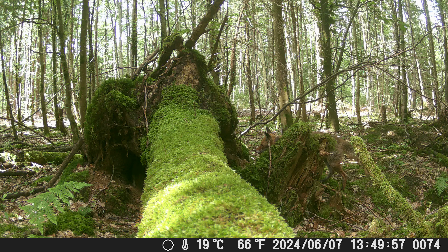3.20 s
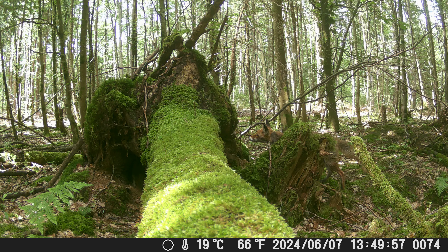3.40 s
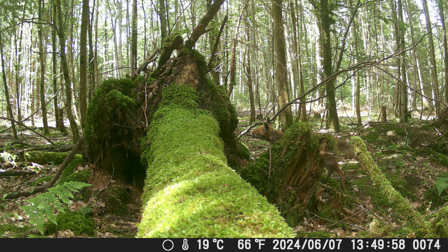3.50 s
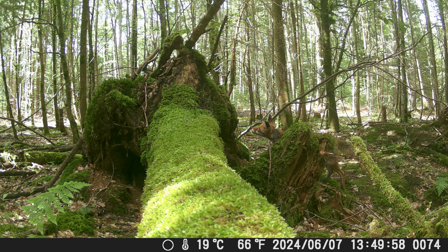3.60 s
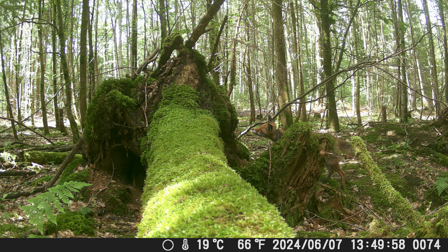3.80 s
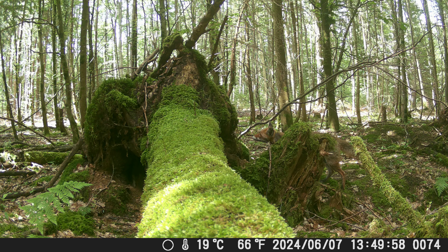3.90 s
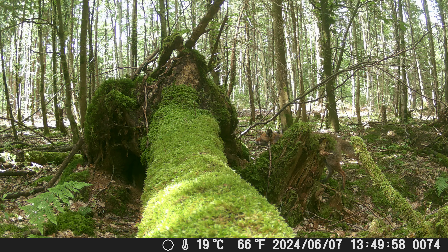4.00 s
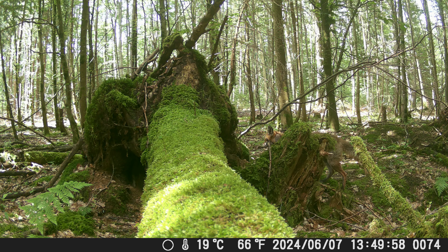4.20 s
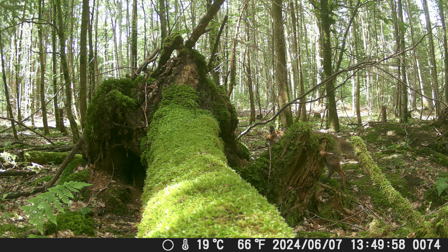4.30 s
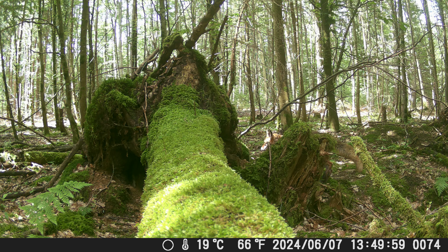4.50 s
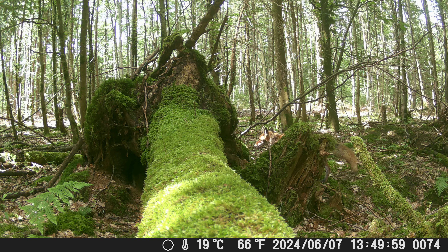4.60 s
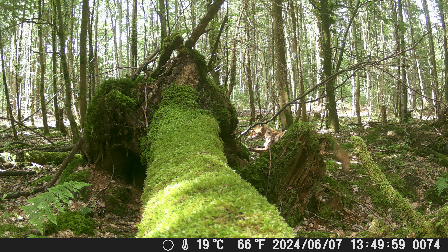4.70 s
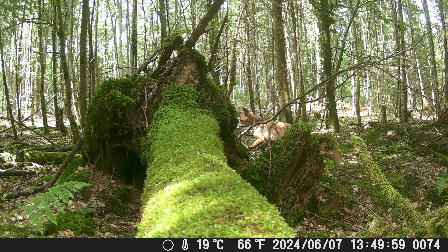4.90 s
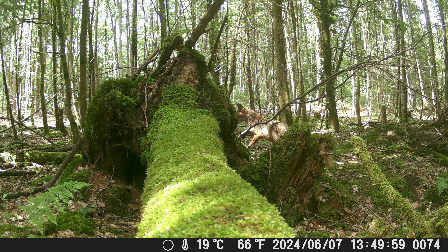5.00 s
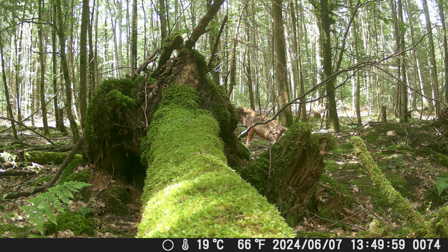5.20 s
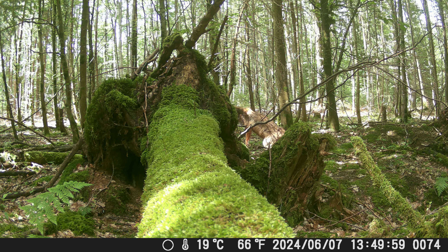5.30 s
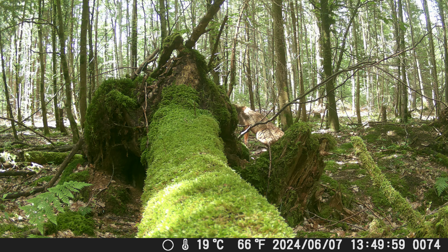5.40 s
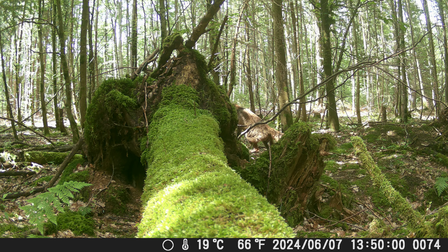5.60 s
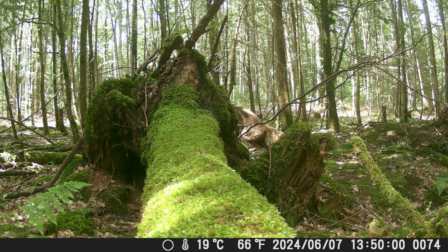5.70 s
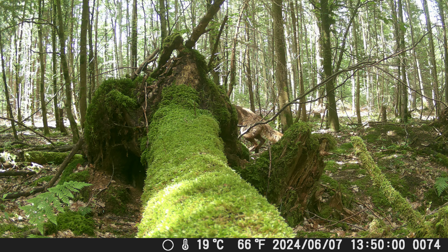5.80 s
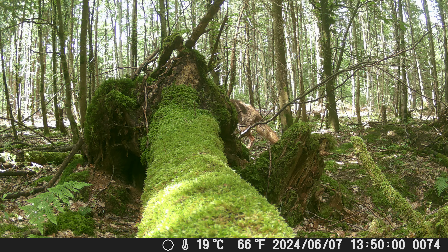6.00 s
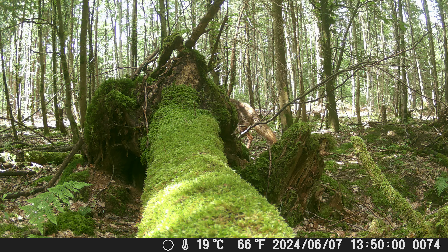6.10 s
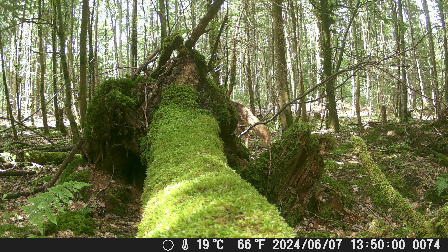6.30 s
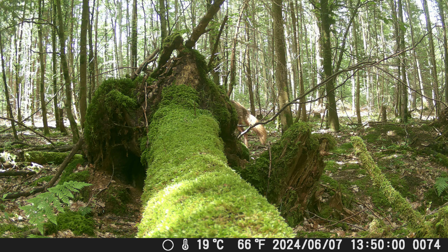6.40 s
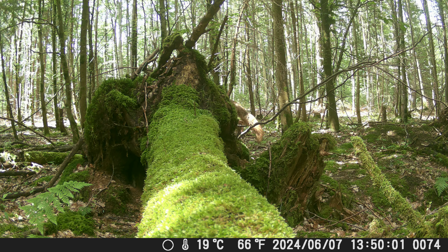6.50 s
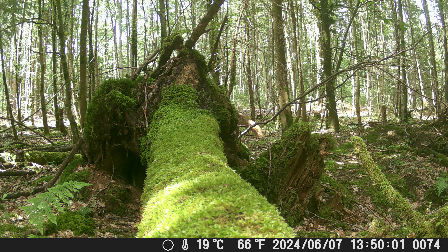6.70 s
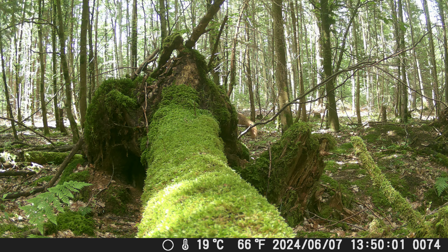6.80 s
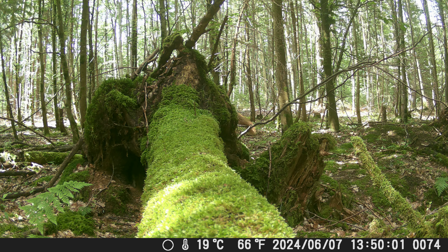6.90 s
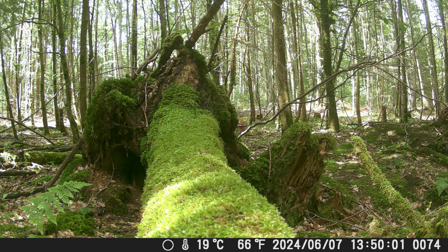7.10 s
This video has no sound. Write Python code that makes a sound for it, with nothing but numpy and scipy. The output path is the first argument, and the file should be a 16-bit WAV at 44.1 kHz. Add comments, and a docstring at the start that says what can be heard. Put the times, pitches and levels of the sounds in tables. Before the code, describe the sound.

Rapid, raspy ticking alarm calls from a nearby small bird echo off trunks, over faint far birdsong and a barely audible low hum.

```python
"""Faint air and a low wavering hum run throughout: shaped noise, and a sine whose strength drifts at random.
From 0.1 s a wren scolds nearby in dry rattles; each tick is a steep falling whistle with a fast rasp.
Echoes off log, stump and twigs smear the ticks, and a longer wash of noise-like echoes off the trunks follows.
From 0.6 s far songbirds whistle in gliding sines; from 0.8 s a second wren adds softer, slowing rattles.
The microphone rings near 7 kHz and bends the waves, which puts a faint knock under each tick."""
import sys
import numpy as np
from scipy import signal
from scipy.fft import rfft, irfft, next_fast_len
from scipy.io import wavfile
from scipy.ndimage import uniform_filter1d

SR = 44100
rng = np.random.default_rng(int(sys.argv[2]) if len(sys.argv) > 2 else 0)


def pcm_store(signal):
    """Save signal as 16-bit PCM."""
    levels = np.round(np.clip(np.atleast_2d(signal), -1, 1) * 32767)
    wavfile.write(sys.argv[1], SR, levels.astype(np.int16).T)


N = 314433  # length in samples
T = np.arange(N) / SR  # time in seconds

# Spectrum of the air in the wood, scaled later to AIR_DB: pitch_hz, relative level_db per Hz
AIR_SPECTRUM = [(20, -2), (50, 0.5), (80, -4), (150, -8.5), (300, -13.5), (700, -19.5), (1500, -23),
                (2500, -27), (3500, -31), (4800, -46), (6700, -46.5), (8500, -50), (10000, -59)]
AIR_DB = -72
HUM_HZ, HUM_DB = 52.1, -81

# The near wren's rattles, before effort, chance and trim:
# start_s, tick_count, pace_ms per tick, skip_ms (how early the second tick comes), level_db,
# fall_ms (time a tick takes to fall to about 4 kHz)
NEAR_RATTLES = [(.1005, 2, 45, 14, -36, 4.7), (.187, 2, 46.7, -0.5, -34.5, 4.5),
                (.288, 7, 47.7, 5.5, -35.5, 5.47), (.632, 4, 44.9, 5, -34.8, 5.1),
                (1.3206, 8, 43.6, 10, -34.5, 5), (1.6903, 4, 43.5, 6.5, -34, 4.9),
                (1.8786, 2, 45, 6, -34, 5.1), (2.011, 2, 45, 9.5, -34.1, 5.2), (2.1197, 2, 45, 7, -35, 5.3),
                (2.3145, 2, 44.5, 12, -36.5, 5.8), (2.4259, 2, 45, 6, -35, 4.9),
                (2.5774, 4, 44.8, 11, -34, 4.56), (2.7698, 2, 45, 0, -34, 4.05),
                (3.2143, 2, 44.6, 14, -35.5, 5.4), (3.2977, 3, 54, 1.5, -32.5, 5.04),
                (3.4494, 7, 44.2, -0.5, -33.5, 5.1), (3.7639, 2, 50.8, 0, -33.6, 4.8),
                (3.8728, 4, 47.9, 0, -32, 5.3), (4.453, 4, 42, 9.5, -34.5, 4.6),
                (4.647, 2, 46, 6.5, -34.5, 5.4), (4.7293, 4, 46.7, 0, -33.5, 4.54),
                (4.9118, 3, 45.3, 0, -33.5, 4.96), (5.6132, 2, 44, 10, -35, 3.7),
                (5.69, 4, 45, 1, -34.5, 3.13), (5.8636, 6, 41.6, 0, -36, 4.4),
                (6.168, 5, 42, 10.5, -36.5, 4.5), (6.4089, 2, 46.6, 0, -38.5, 4.7),
                (7.0152, 4, 38.3, 8, -40, 4.5)]
SKIP_FADE = .55  # ticks come in pairs; each pair keeps this share of the skip of the one before
EFFORT_S = .08  # every tick adds 1 to the bird's effort, which ebbs with this time constant
# A tick at effort 1 and the usual level, and what each further unit of effort adds to it
TICK_HZ, EFFORT_HZ = 6815, 271
RISE_MS, EFFORT_RISE_MS = 4.4, 1.1
EFFORT_FALL_MS, EFFORT_DB = .6, 2
USUAL_DB, HZ_PER_DB = -34.5, 44.5  # rattles louder than usual are higher too
# Chance from tick to tick: share of the pitch, share of the rise and fall times, level in dB
PITCH_SCATTER, LENGTH_SCATTER, SCATTER_DB = .012, .07, 0.28
# Course of one near tick: stage (-1 onset, 0 peak, 1 fallen to about 4 kHz, 3 end),
# pitch_share of the peak pitch, level_db, flutter_depth (no unit)
NEAR_COURSE = [(-1.0626, 1.13, -15, 1), (-0.8416, 1.09, -5.5, 1.0), (-0.2773, 1.03, -1, 1.0),
               (0.24, .935, 1, 0.72), (0.5974, 0.778, -2, 0.87), (0.81, .60, -6.5, 0.25),
               (1.28, .43, -12, 0.84), (2, 0.3354, -17, 0.94), (3, 0.26, -26.5, .5)]
# Low end of the near ticks' sweep: time_s, level_db below 4 kHz
LOW_END_LEVEL = [(.1, 2.5), (.7, .5), (1.7, -1), (2.4, 3), (2.7, 0), (3.3, 1.5), (3.6, -1.5), (6, -2),
                 (6.45, 2), (7.1, 2.5)]
# Echoes off the log and stump, before the bird's bobbing and turning: delay_ms, level_db
NEAR_WREN_ECHOES = [(1.25, -11), (2.5, -9), (3.7, -12.5), (6.3, -11.5), (8.8, -16)]

# Far songbirds, before their mixing levels: start_s, length_s, start_hz, end_hz, level_db,
# warble (random, as a share of the pitch)
FAR_WHISTLES = [(0.579, 0.31, 3870, 3760, -86.5, .02), (0.825, 0.16, 3670, 3870, -83.5, 0.028),
                (1.678, 0.21, 3540, 3391, -82.5, 0.016), (1.867, 0.14, 3110, 2930, -79.5, 0.019),
                (2.076, 0.27, 2588, 2495, -84.5, .025), (2.859, 0.14, 3500, 3760, -86.5, 0.029),
                (3.11, 0.16, 1965, 2076, -73.5, 0.0045), (4.2, 0.15, 2037, 1873, -81, .03),
                (4.497, 0.2, 2710, 2750, -84, 0.0024), (4.767, 0.14, 1927, 2090, -78.5, .015),
                (4.856, 0.29, 2318, 2334, -79.5, 0.0045), (5.88, 0.18, 1880, 1840, -86, 0.016),
                (6.381, .2, 2377, 2364, -74, 0), (6.682, 0.14, 3310, 3280, -86.5, 0.004),
                (6.841, .11, 2380, 2424, -80.5, 0.016)]

# The second wren's rattles, before trim: start_s, tick_count, first_gap_ms, first_level_db, last_level_db
SECOND_RATTLES = [(0.8175, 11, 30.4, -42.5, -44.5), (2.504, 2, 38.5, -47, -47), (2.8048, 5, 42.6, -44, -43),
                  (4.058, 5, 31.6, -58, -49), (4.2432, 6, 36.3, -48.5, -54.5),
                  (5.3645, 7, 31.4, -50, -45.5)]
SLOWING_MS = 1.3  # each of its gaps is this much longer than the one before
# Course of the second wren's tick: stage (0 peak, 3 end), pitch_share of the peak pitch, level_db,
# flutter_depth (no unit)
SECOND_COURSE = [(-0.84, 1.2, -8.5, .6), (-0.26, 1.05, 1, 0.5), (0.44, .96, 2, 0.8),
                 (0.98, .76, -2.5, 0.66), (1.1, .62, -0.5, 0.37), (1.73, .54, -5, .4),
                 (3, 0.44, -19.5, 0.47)]
# Echoes of the second wren, before its bobbing and turning: delay_ms, level_db
SECOND_WREN_ECHOES = [(2.6, -17.5), (6.0, -10), (7.2, -8), (9.0, -13)]

# Response of the microphone in its housing: pitch_hz, level_db
MIC_RESPONSE = [(20, 0), (2500, 1), (3200, -0.5), (4200, 3), (5100, 1.5), (5700, 10), (6300, 19),
                (6800, 21), (7300, 20.5), (7950, 9.5), (8400, 8.5), (9000, 4.5)]
TOP_HZ = 8750  # almost nothing passes far above this pitch


def undb(db):
    """Turn decibels into a plain multiplier."""
    return 10 ** (np.asarray(db) / 20)


def unit(x):
    """Scale to an average strength (rms) of 1."""
    return x / np.sqrt(np.mean(x ** 2))


def colour(x, points):
    """Filter by a spectrum of (Hz, dB) points, joined by straight lines on a logarithmic pitch scale."""
    point_hz, point_db = np.transpose(points)
    size = next_fast_len(len(x) + 4096)
    hz = np.maximum(np.arange(size // 2 + 1) * SR / size, 1)
    gain = undb(np.interp(np.log(hz), np.log(point_hz), point_db))
    return irfft(rfft(x, size) * gain, size)[:len(x)]


def add(out, x, start_s):
    """Mix x into out from a start time."""
    i = max(int(start_s * SR), 0)
    out[i:i + len(x)] += x[:max(len(out) - i, 0)]


def air(swell_db=-0.34):
    """Faint air in the canopy as slowly swelling noise, over a low hum of randomly wavering strength."""
    swell = np.interp(T, np.linspace(0, T[-1], 20), rng.standard_normal(20))
    rustle = unit(colour(rng.standard_normal(N), AIR_SPECTRUM)) * undb(AIR_DB + swell_db * swell)
    waver = unit(uniform_filter1d(rng.standard_normal(N), size=3000))
    hum = unit(waver * np.sin(2 * np.pi * HUM_HZ * T))
    return rustle + undb(HUM_DB) * hum


def tone(hz):
    """A sine that follows a pitch curve, from a random phase."""
    cycles = np.cumsum(hz) / SR
    return np.sin(2 * np.pi * (cycles + rng.random()))


def tail(t60_s, build_s, size):
    """Echo of countless scatterers: noise that builds up and falls by 60 dB in t60_s, total energy 1."""
    t = np.arange(size) / SR
    build = 1 - np.exp(-(t / build_s) ** 2)
    decay = np.exp(-np.log(1000) * t / t60_s)
    h = rng.standard_normal(size) * build * decay
    return h / np.sqrt(np.sum(h ** 2))


def rattle_ticks():
    """Uneven pairs that settle into a steady rattle; gives time s, level dB, fall ms, effort per tick."""
    effort, last_s = 0, 0
    for start_s, count, pace_ms, skip_ms, db, fall_ms in NEAR_RATTLES:
        for k in range(round(count)):
            early_ms = (k % 2) * skip_ms * SKIP_FADE ** (k // 2)
            s = start_s + (k * pace_ms - early_ms) / 1000
            effort *= np.exp((last_s - s) / EFFORT_S)
            yield s, db, fall_ms, effort
            effort, last_s = effort + 1, s


def tick(course, hz, rise_ms, fall_ms, rasp, flutter_hz=1010, flutter_spread=.15, waver=0.019,
         upper_hz=1150, upper_db=-5):
    """One falling whistle, peaking about 12 ms in, chopped by the flutter of the syrinx (the voice organ)."""
    ms = np.arange(1536) / SR * 1000 - 12
    stage = ms / np.where(ms < 0, rise_ms, fall_ms)
    at, *columns = np.transpose(course)
    share, db, depth = (np.interp(stage, at, column) for column in columns)
    drift = [unit(uniform_filter1d(rng.standard_normal(len(ms)), size=40)) for _ in range(3)]
    pitch = hz * share * (1 + waver * drift[0])
    flutter = tone(flutter_hz * np.exp(flutter_spread * (rng.standard_normal() + drift[1])))
    pulses = np.exp(rasp * depth * flutter) / np.sqrt(np.i0(2 * rasp * depth))  # mean power stays 1
    # The other side of the syrinx joins in a little higher, more strongly in a raspier tick
    upper_pitch = pitch * (1 + waver * drift[2]) + upper_hz
    voices = tone(pitch) + rasp * undb(upper_db) * tone(upper_pitch)
    sounding = (stage > at[0]) * (stage < at[-1])
    gate = uniform_filter1d(undb(db) * sounding, size=16)
    return gate * pulses * voices


def perch(x, echoes, twigs, bob_ms, turn_db=1.97):
    """Add close echoes and a short scatter off twigs, then scale the loudest 6 ms to power 1."""
    size = 6144
    khz = np.arange(size // 2 + 1) * SR / size / 1000
    bounced = rfft(twigs, size)
    for delay_ms, db in echoes:
        # The delays shift as the bird bobs
        shifted_ms = delay_ms + bob_ms * rng.standard_normal()
        bounced = bounced + undb(db) * np.exp(-2j * np.pi * khz * shifted_ms)
    # As it turns its head, more or less of the tick goes by way of the echoes
    turn = undb(turn_db * rng.standard_normal())
    y = irfft(rfft(x, size) * (1 + turn * bounced))
    # Loudness is counted as the microphone's ringing weighs it
    heard = colour(y, MIC_RESPONSE)
    return y / np.sqrt(uniform_filter1d(heard ** 2, size=265).max())


def near_wren(trim_db=-2.5, lead_s=.0122, rasp_per_ms=.16, twigs_db=-7.5, twigs_t60_s=0.057, restless=.6):
    """Hard ticks, about 22 a second: higher, louder, longer and raspier as effort builds up after a rest."""
    out = np.zeros(N)
    twigs = tail(twigs_t60_s, .004, size=4096)
    for s, db, fall_ms, effort in rattle_ticks():
        push, chance = effort - 1, rng.standard_normal(4)
        hz = TICK_HZ + EFFORT_HZ * push + HZ_PER_DB * (db - USUAL_DB)
        hz *= 1 + PITCH_SCATTER * chance[0]
        rise_ms = (RISE_MS + EFFORT_RISE_MS * push) * np.exp(LENGTH_SCATTER * chance[1])
        fall_ms = (fall_ms + EFFORT_FALL_MS * push) * np.exp(LENGTH_SCATTER * chance[2])
        gain = undb(db + trim_db + EFFORT_DB * push + SCATTER_DB * chance[3])
        # The bird moves little between ticks, so the scatter changes only in part
        fresh_twigs = tail(twigs_t60_s, .004, size=4096)
        twigs = np.cos(restless) * twigs + np.sin(restless) * fresh_twigs
        note = tick(NEAR_COURSE, hz, rise_ms, fall_ms, rasp=rasp_per_ms * fall_ms)
        low_end_db = np.interp(s, *np.transpose(LOW_END_LEVEL))
        note = colour(note, [(4000, low_end_db), (6000, 0.00047)])
        # Starting early by lead_s puts the tick's peak near its listed time
        add(out, gain * perch(note, NEAR_WREN_ECHOES, undb(twigs_db) * twigs, bob_ms=.1), s - lead_s)
    return out


def trunks(x, early_db=-18, early_t60_s=0.3, late_db=-21, late_t60_s=0.61):
    """The wood answers with two noise-like echoes: near trunks quickly, far ones with a long wash."""
    near = undb(early_db) * tail(early_t60_s, 0.022, size=SR)
    far = undb(late_db) * tail(late_t60_s, 0.032, size=SR)
    return signal.fftconvolve(x, near + far)[:N]


def songbirds(waver=0.0011, direct_db=-3, wet_db=-4):
    """Far whistles: gliding, warbling sines drawn out by the reverberation of the wood."""
    out = np.zeros(N)
    for s, length_s, start_hz, end_hz, db, warble in FAR_WHISTLES:
        u = np.linspace(0, 1, int(length_s * SR))
        drift = unit(uniform_filter1d(rng.standard_normal(SR), size=400))[:len(u)]
        hz = (start_hz + (end_hz - start_hz) * u) * (1 + (waver + warble) * drift)
        swell = np.sqrt(2) * np.sin(np.pi * u)
        add(out, undb(db) * swell * tone(hz), s)
    reverberation = signal.fftconvolve(out, tail(1.5, 0.022, size=SR))[:N]
    return undb(direct_db) * out + undb(wet_db) * reverberation


def second_wren(trim_db=-7.5, lead_s=.0124, rasp=0.58, twigs_db=-9, twigs_t60_s=0.13):
    """Slowing rattles from behind the stump: purer, lower ticks lingering near 4 kHz, with clustered echoes."""
    out = np.zeros(N)
    for s, count, gap_ms, first_db, last_db in SECOND_RATTLES:
        for k, db in enumerate(np.linspace(first_db, last_db, round(count))):
            note = tick(SECOND_COURSE, hz=6550, rise_ms=2.1, fall_ms=4.3, rasp=rasp)
            twigs = undb(twigs_db) * tail(twigs_t60_s, 0.0035, size=4096)
            echoed = perch(note, SECOND_WREN_ECHOES, twigs, bob_ms=0.36)
            add(out, undb(db + trim_db) * echoed, s - lead_s)
            s += (gap_ms + k * SLOWING_MS) / 1000
    return out


def scene():
    """Both wrens, their echo in the wood, far song and air."""
    wrens = near_wren() + second_wren()
    return (wrens + trunks(wrens) + songbirds() + air())[None]


def record(dry, bend=5.5):
    """The microphone rings near 7 kHz; its lopsided response turns beats in the ticks into low knocks."""
    x = colour(dry[0], MIC_RESPONSE)
    # Squaring the wave brings out the beats; two filters keep roughly 440 to 3500 Hz of them
    knocks = signal.sosfilt(signal.butter(1, 440, "high", fs=SR, output="sos"), x ** 2)
    knocks = signal.sosfilt(signal.butter(2, 3500, fs=SR, output="sos"), knocks)
    top = signal.ellip(8, .2, 70, TOP_HZ, fs=SR, output="sos")
    return signal.sosfilt(top, x + bend * knocks)[None]


dry = scene()
out = record(dry)
pcm_store(out)
```